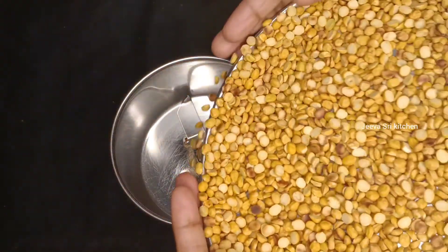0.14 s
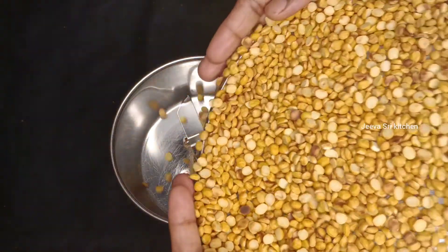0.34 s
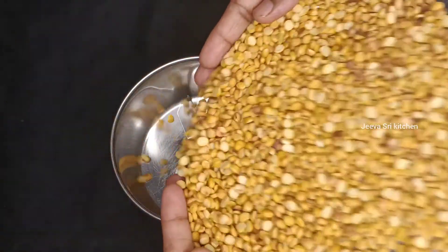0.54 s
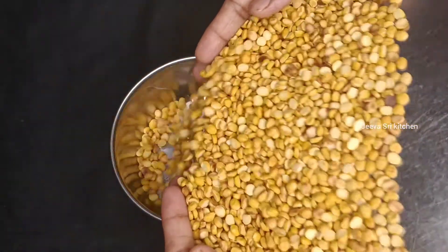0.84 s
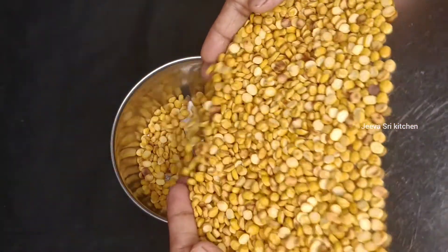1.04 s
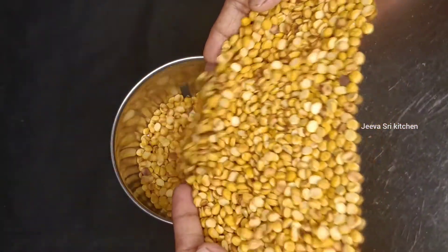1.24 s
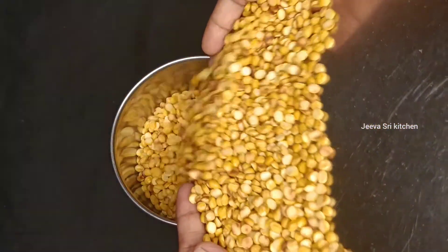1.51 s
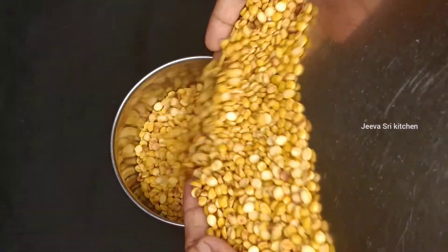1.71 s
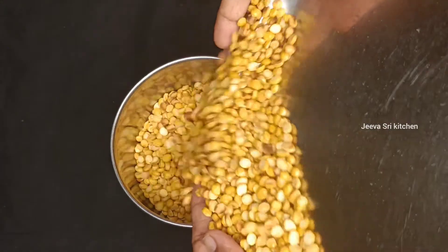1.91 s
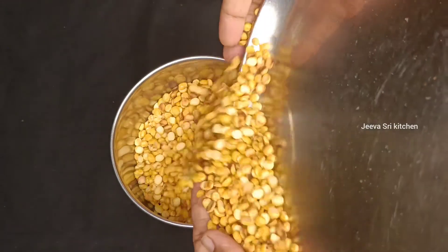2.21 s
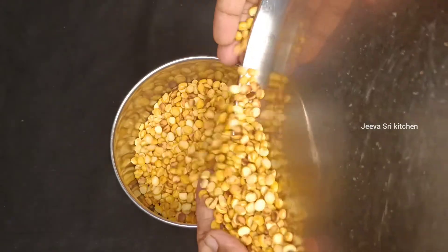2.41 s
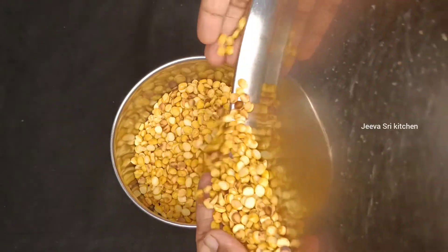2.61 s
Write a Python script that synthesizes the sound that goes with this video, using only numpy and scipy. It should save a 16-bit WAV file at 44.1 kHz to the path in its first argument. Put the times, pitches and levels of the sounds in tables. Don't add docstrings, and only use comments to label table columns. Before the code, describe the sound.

Dry lentils pour from a steel bowl into a steel jar, rattling brightly and densely.

```python
import sys
import numpy as np
from scipy import signal
from scipy.fft import rfft, irfft
from scipy.io import wavfile
from scipy.ndimage import uniform_filter1d

SR = 44100
rng = np.random.default_rng(int(sys.argv[2]) if len(sys.argv) > 2 else 0)


def magnitude_from_level(level_db):
    exponent = np.asarray(level_db, float) / 20
    return 10 ** exponent


def wav_out(sig):
    wavfile.write(sys.argv[1], SR, np.round(np.clip(np.atleast_2d(sig).T, -1, 1) * 32767).astype(np.int16))


N = 121275


def read(points, hz):
    f, value = np.transpose(points)
    return np.interp(np.log(hz + 1), np.log(f + 1), value)


def control(table, col):
    table = np.array(table)
    return magnitude_from_level(np.interp(np.arange(N) / SR, table[:, 0], table[:, col]))


def evened(x):
    return x / np.sqrt(np.mean(x ** 2) + 1e-20)


def colour(x, points):
    hz = np.fft.rfftfreq(x.shape[-1], 1 / SR)
    return irfft(rfft(x) * magnitude_from_level(read(points, hz)), x.shape[-1])


def resonate(x, peaks):
    out = 0
    for hz, width_hz, db in peaks:
        r = np.exp(-np.pi * width_hz / SR)
        mode = signal.lfilter([1, 0, -1], [1, -2 * r * np.cos(2 * np.pi * hz / SR), r * r], x)
        out = out + magnitude_from_level(db) * evened(mode)
    return evened(out)


def drift(x, pitch, width_hz):
    hz = np.interp(np.arange(N) / SR, *np.transpose(pitch))
    turn = np.exp(2j * np.pi * np.cumsum(hz) / SR)
    r = np.exp(-np.pi * width_hz / SR)
    return evened((turn * signal.lfilter([1 - r], [1, -r], x / turn)).real)


def tick(t60, rise):
    t = np.arange(2048) / SR
    a, b = rng.standard_normal((2, 2048))
    same, lag = 0.24, 5
    x = np.array([same * np.roll(b, lag) + np.sqrt(1 - same ** 2) * a, b])
    x = x * magnitude_from_level(-60 * t / t60) * (1 - np.exp(-t / rise))
    return x / np.linalg.norm(x[0])


def bright(x):
    return signal.sosfilt(signal.butter(4, 9900, "high", fs=SR, output="sos"), x)


def ring(modes, spread_db, detune):
    t, out = np.arange(2048) / SR, 0
    for (hz, db, t60), (a, b, p, q) in zip(modes, rng.standard_normal((len(modes), 4))):
        phase = 3 * np.array([[p], [q]])
        decay = magnitude_from_level(db + spread_db * a - 60 * t / t60)
        out = out + decay * np.sin(2 * np.pi * hz * (1 + detune * b) * t + phase)
    out = out * (1 - np.exp(-t / 0.000043))
    return out / np.linalg.norm(out[0])


def shower(per_s, spread_db, make, count=16):
    size = magnitude_from_level(spread_db * np.minimum(rng.exponential(1, N), 4)) * (rng.random(N) < per_s / SR)
    spot = rng.integers(0, count, N)
    out = 0
    for k in range(count):
        out = out + signal.oaconvolve((size * (spot == k))[None], make(), axes=1)[:, :N]
    return evened(out)


def slip():
    start_s, rise_s = .05, .05
    return np.clip((np.arange(N) / SR - start_s) / rise_s, 0, 1) ** 2


# time_s, sliding_db, falling_db, bare_steel_db, jar_air_db, bowl_ring_db, worktop_db
FLOW = [(.1, -44.5, -36, -77, -63, -13, 2), (.2, -48.5, -45, -66, -55, -13.5, 9),
        (.28, -41.5, -45, -59, -39.5, -17, 12.5), (.33, -45, -26.5, -49, -50.5, -36.5, 1.5),
        (.5, -41.5, -25.5, -28.5, -63, -26, 0.5), (.66, -36.5, -22, -31, -49, -20, -3.5),
        (.8, -37, -18.5, -21.5, -52.5, -25, 0), (.95, -36, -20.5, -22, -46, -46, -0.5),
        (1.15, -39.5, -25.5, -21.5, -52, -25, -1), (1.37, -38, -20, -19.5, -53, -19.5, 5),
        (1.6, -40.5, -26, -27, -54, -21.5, 2), (1.9, -43, -30.5, -31, -55, -11.5, -0.5),
        (2.12, -44, -29, -60, -60, -17, 2), (2.35, -49, -34.5, -59, -60, -12, 2),
        (2.55, -51.5, -38.5, -52, -65, -15, 1), (2.75, -53, -37, -44, -64.5, -20, -2.5)]
# pitch_hz, width_hz, level_db
WORKTOP = [(114, 12, -2), (170, 20, -6), (189, 14, -4), (231, 13, -2), (356, 22, -7), (290, 30, -13),
           (405, 30, -11), (475, 25, -9)]
# pitch_hz, level_db
ROOM = [(25, 14.5), (60, 4.5), (150, 13.5), (400, -30), (1000, -7.5), (3000, 1.5), (8000, -0.5),
        (16000, -6)]


def kitchen():
    a, c, d = rng.standard_normal((3, N))
    rumble = magnitude_from_level(-58.5) * control(FLOW, 6) * resonate(np.array([a, a]), WORKTOP[:5])
    tone = magnitude_from_level(-52) * evened(colour(np.array([c + 0.76 * d, d + 0.26 * c]), ROOM))
    knock_s, width_s = .3465, 0.000075
    u = np.maximum(np.arange(N) / SR - knock_s, 0) / width_s
    knock = magnitude_from_level(-25) * -u * np.exp(1 - u) * magnitude_from_level([[-6], [3]])
    return rumble + tone + knock


# start_s, level_db, rise_s, t60_s, tilt_db_per_octave
BUMPS = [
    (.0, -34, .02, 0.11, 0.5),
    (0.028, -35, 0.05, 0.17, -7),
    (0.109, -38, 0.026, 0.21, 6),
    (0.151, -33, 0.029, 0.22, -2),
    (0.189, -41.5, 0.084, 0.34, -0.5),
]


def bumps():
    out = np.zeros(N)
    for s, db, rise, t60, tilt_db in BUMPS:
        t = np.maximum(np.arange(N) / SR - s, 0)
        body = 0
        for hz, _, mode_db in WORKTOP:
            level = magnitude_from_level(mode_db + tilt_db * np.log2(hz / 200))
            body = body + level * np.sin(2 * np.pi * (hz * t + rng.random()))
        band = signal.butter(2, [150, 520], "band", fs=SR)
        scuff = evened(signal.lfilter(*band, rng.standard_normal(N)))
        envelope = magnitude_from_level(db - 60 * (t / t60) ** 2) * (1 - np.exp(-(t / max(rise, .035)) ** 2))
        out += envelope * (body + 0.59 * scuff)
    return out * magnitude_from_level([[-.4], [.4]])


# pitch_hz, width_hz, level_db
AIR = [(495, 24, -7), (805, 49, 7)]
# time_s, pitch_hz
AIR_PITCH = [(.3, 473), (.55, 495), (.9, 527), (1.4, 526), (2.0, 550), (2.75, 540)]


def hollows(drive):
    opening = np.clip((np.arange(N) / SR - .27) / 0.092, 0, 1)
    air = 0.44 * resonate(drive, AIR) + 0.9 * drift(drive, AIR_PITCH, 40)
    return opening * control(FLOW, 4) * magnitude_from_level(0.27) * air


# pitch_hz, level_db
SEED_RUB = [(200, -16), (700, -6.5), (1500, -8), (3000, 4.5), (4600, -0.5), (7000, 6.5), (11000, 2),
            (16000, -7.5)]
# pitch_hz, width_hz, level_db
SCRAPE = [(7000, 490, -2.5), (11070, 1200, -4)]


def sliding():
    t = np.arange(N) / SR
    slow = uniform_filter1d(uniform_filter1d(rng.standard_normal(N), 500), 300)
    clumps = magnitude_from_level(.8 * evened(slow))
    grains = shower(3000, 0.81, lambda: tick(0.021, 0.000067)) * clumps
    scrape_db = -18.5 + 10.5 * t - 41 * np.maximum(t - 2.29, 0)
    hiss = evened(colour(grains, SEED_RUB)) + magnitude_from_level(scrape_db) * resonate(grains, SCRAPE)
    at_rim = np.exp(-((t - 2.12) / 0.11) ** 2)
    hiss = hiss + magnitude_from_level(-2) * at_rim * resonate(grains, [(10400, 310, 0)])
    drive = rng.standard_normal((3, N))
    drive = drive[:2] + 0.87 * drive[2]
    bowl = control(FLOW, 5) * resonate(drive, [(992, 56, 0)])
    return slip() * control(FLOW, 1) * magnitude_from_level(6) * (hiss + bowl) + hollows(drive)


# pitch_hz, level_db, t60_s
FLOOR = [(7780, 0, .018), (8000, -3, .013), (8480, -4, .008), (9470, -1, .022), (9865, -8, .035)]
# pitch_hz, level_db, t60_s
WALL = [(10150, -9, .015), (11750, -9, .025), (12640, -3, .015), (13800, -2, .018), (14620, 0, .014),
        (15300, -1, .014)]


def falling():
    wall = shower(1500, 6.0, lambda: 0.55 * ring(WALL, 1.0, 0.0069) + bright(tick(0.045, 0.0001)))
    floor = shower(900, 2.4, lambda: ring(FLOOR, 12.0, 0.0054))
    return slip() * (control(FLOW, 2) * magnitude_from_level(-1.9) * wall + control(FLOW, 3) * magnitude_from_level(-7) * floor)


# pitch_hz, level_db
CLACK = [(1500, -21), (2800, 1), (5200, 1.5), (7500, 4), (12000, 1)]


def seed(s, db, ring_db=-22, low_db=-27):
    out = np.zeros((2, 4096))
    bounce = round(0.0026 * SR * rng.uniform(0.55, 1.5))
    for at, drop_db in ((0, 0), (bounce, -16)):
        hit = .5 * ring(WALL, 3.1, 0.0093) + 1.17 * bright(tick(0.071, 0.0004))
        hit = hit + magnitude_from_level(ring_db) * ring(FLOOR, 3.3, 0.0049)
        hit = hit + magnitude_from_level(low_db - 4.5) * colour(tick(0.069, 0.0001), CLACK)
        out[:, at:at + 2048] += magnitude_from_level(db + drop_db) * hit
    return round((s + .0004) * SR), out


def seeds(table, gain_db):
    out = np.zeros((2, N + 4096))
    for row in table:
        at, hit = seed(*row)
        out[:, at:at + 4096] += magnitude_from_level(gain_db) * hit
    return out[:, :N]


# start_s, peak_db, high_ring_db, low_tick_db
EARLY = [(0.2301, -31, -14, 17.5), (0.2765, -9.5, -33, -33), (0.293, -11, -19, -18.5),
         (0.313, -7.5, -11.5, 2.5), (0.3197, -14, -20, -5), (0.3273, -4, -25, -1.5),
         (0.3434, -13, -35, -34), (0.3877, -9.5, -11, -1), (0.401, -10, -27, -32), (0.4228, -1.5, -19, -28),
         (0.4554, -8.5, -0.5, -26), (0.5313, -7, -33, -36), (0.5626, -4, -29, -19.5), (0.5985, -7, -14, -7),
         (0.6138, -7, 1.5, -17.5), (0.6553, -9, -19, -22), (0.6705, -1.5, -6.5, -18.5),
         (0.687, -8, -11, -10), (0.7003, -2, -7, -16), (0.7292, -13.5, -20, -1.5), (0.7382, -4.5, -1, -18),
         (0.8282, -4.5, -21, -38), (0.9498, -6.5, -22, -22)]
# start_s, peak_db, high_ring_db
SWELL = [(0.7694, -16, -7), (0.7894, -8, -5), (0.8444, -8, -7), (0.8694, -8, -3), (0.8814, -8, -5),
         (0.8994, -12, 4), (0.9294, 0.5, -12), (0.9674, -7, -3), (0.9944, -15, -8), (1.0114, -11, -4),
         (1.0444, -12, -2.5), (1.0624, -23, -5), (1.0814, -19, -1), (1.1094, -1.5, -3), (1.1644, -4, 4),
         (1.1844, -8, 0)]
# start_s, peak_db, high_ring_db
MIDDLE = [(1.0256, -11.5, 7), (1.2185, -5, 4), (1.1477, -5.5, 3.5), (1.2084, -6, -1), (1.2404, -10, 4.5),
          (1.2705, -7.5, 7.5), (1.29, -13, 10.5), (1.3104, -10, 5), (1.3165, -9, 5), (1.33, -14, 3),
          (1.34, -11.5, 14), (1.3492, -22, 2), (1.3554, -10, 7), (1.3693, -7.5, -1), (1.3824, 0.5, -5),
          (1.3997, -11, -8), (1.4596, -10, 6.5), (1.5314, -15, 4), (1.617, -7, -2), (1.6728, -3, -4)]
# start_s, peak_db
LATE = [(1.741, -9), (1.8936, -3.5), (1.924, -10), (1.995, -10), (2.0073, -11), (2.036, -6), (2.0737, -7),
        (2.0955, -5.5), (2.1334, -3.5), (2.25, -12), (2.2706, -13.5), (2.4112, -9.5), (2.4383, -12),
        (2.4685, -8), (2.5446, -19.5), (2.7073, -15.5)]
# start_s, peak_db, high_ring_db, low_tick_db
STRAY = [(1.7514, -10, -17, -20), (1.7878, -9, -8, -10.5), (1.81, -14.5, -6.5, -14), (1.855, -14, -21, -13),
         (1.982, -18, -14, -15), (2.0194, -7, -19, -22), (2.2065, -15, -14, -12), (2.2606, -12, -14, -2),
         (2.4878, -11.5, -13, -7), (2.564, -17, -10, -10), (2.5923, -25, -14, -10), (2.6094, -20, -5, -8),
         (2.6354, -32, -5, -8), (2.6634, -23, -7, 1), (2.7285, -20.5, -3.5, -4)]


def single_seeds():
    out = seeds(EARLY, 10.2) + seeds(SWELL, 6.1) + seeds(MIDDLE, 4.9)
    return out + seeds(LATE, 12.6) + seeds(STRAY, 8.1)


def scene():
    return kitchen() + bumps() + sliding() + falling() + single_seeds()


# pitch_hz, level_db
MASK = [(900, -14), (1500, -6), (2500, -4.6), (3900, -3.6), (5200, -4.6), (6200, -10), (10000, -30)]


def masked(x):
    hz, t, z = signal.stft(x, SR, nperseg=2048, noverlap=1024)
    power = abs(z.mean(0)) ** 2
    around = uniform_filter1d(uniform_filter1d(power, size=9, axis=0), size=31, axis=1)
    power = power / around
    bar = uniform_filter1d(power, size=48, axis=0) * magnitude_from_level(2 * read(MASK, hz))[:, None]
    weak = uniform_filter1d(power, size=7, axis=0) < bar
    weak = (uniform_filter1d(1. * weak, size=8, axis=0) > 0.1) & (t > .2)
    weak = weak | np.roll(weak, 1, axis=1)
    return signal.istft(z * ~weak, SR, nperseg=2048, noverlap=1024)[1][:, :N]


def band_limit(x):
    return signal.sosfilt(signal.butter(12, 16970, fs=SR, output="sos"), x)


# pitch_hz, level_db
LEFT = [(1000, 1), (5000, 8.5), (6800, 7.5), (7500, -6), (8500, 3.5), (9700, -6), (12200, 2.5),
        (14200, 8.5)]
# pitch_hz, level_db
RIGHT = [(1000, 3), (5000, 7), (7000, -7.5), (7750, 6.5), (9500, 5.5), (12500, 0), (15000, -7.5),
         (15400, -11)]


def record(dry):
    x = np.array([colour(dry[0], LEFT), colour(dry[1], RIGHT)])
    ceiling, edge_hz = 1.15, 15780
    x = ceiling * np.tanh(x / ceiling)
    edge = signal.firwin(801, edge_hz, window=("kaiser", 7), fs=SR)
    x = signal.oaconvolve(x, edge[None], "same")
    return band_limit(masked(x))


dry = scene()
out = record(dry)
wav_out(out)
```